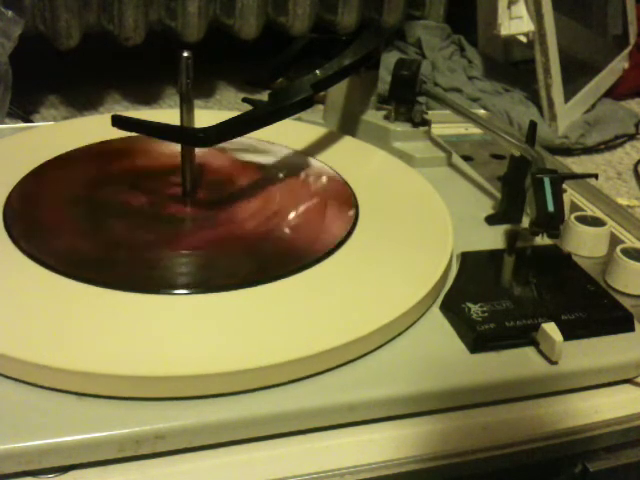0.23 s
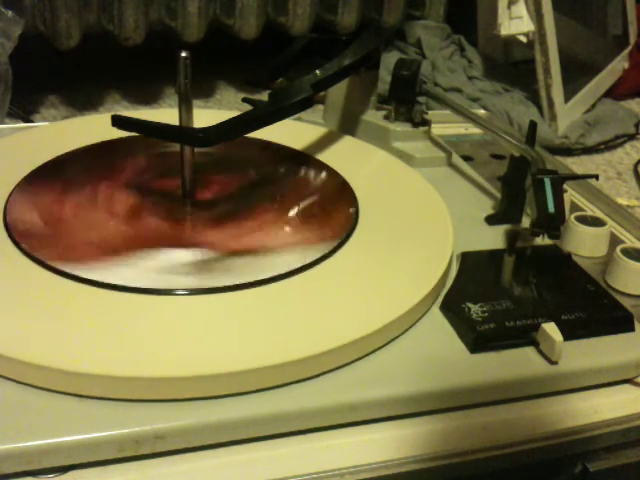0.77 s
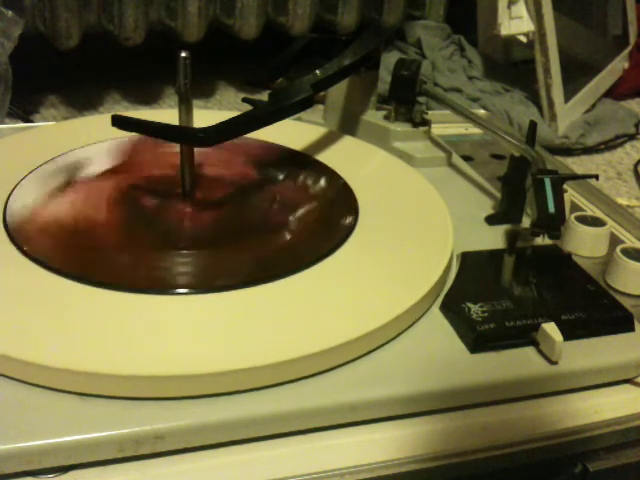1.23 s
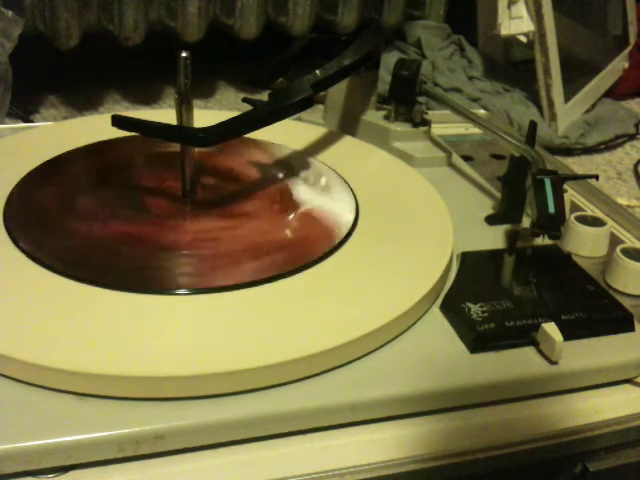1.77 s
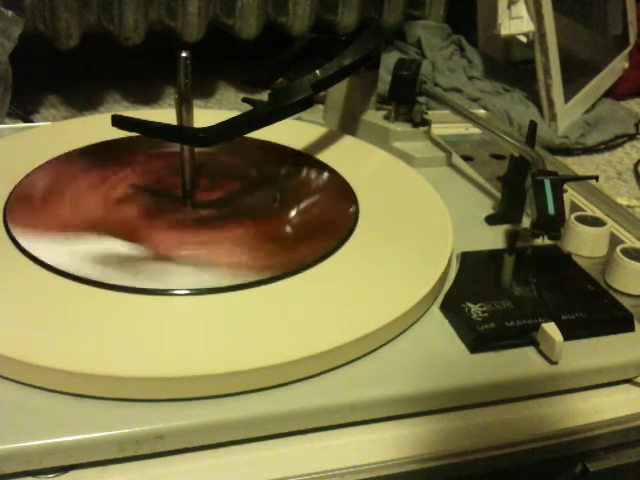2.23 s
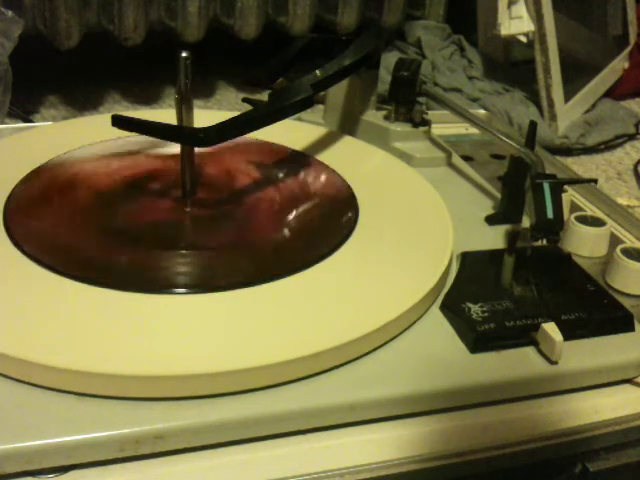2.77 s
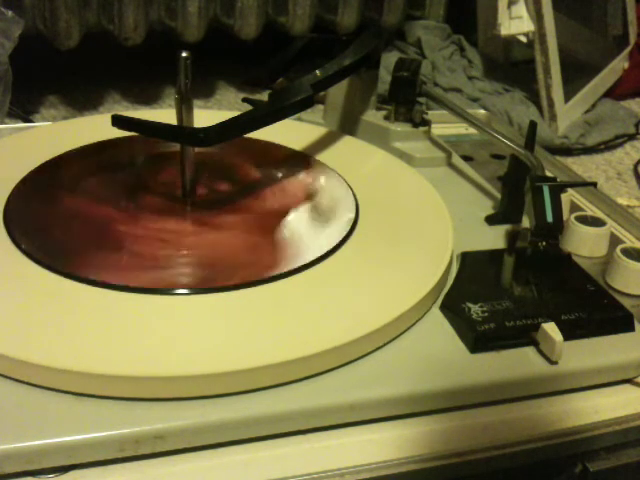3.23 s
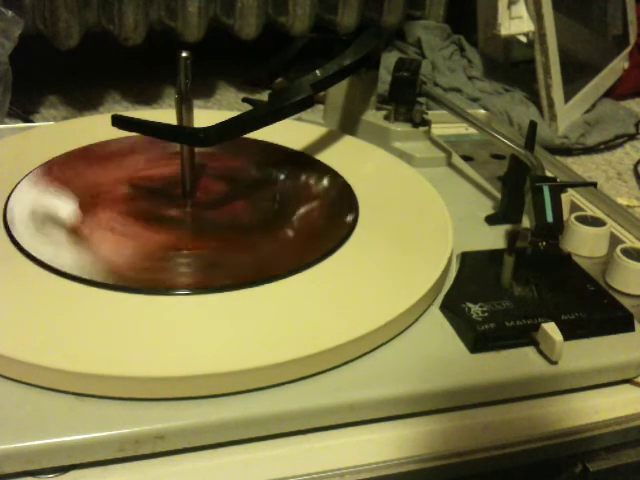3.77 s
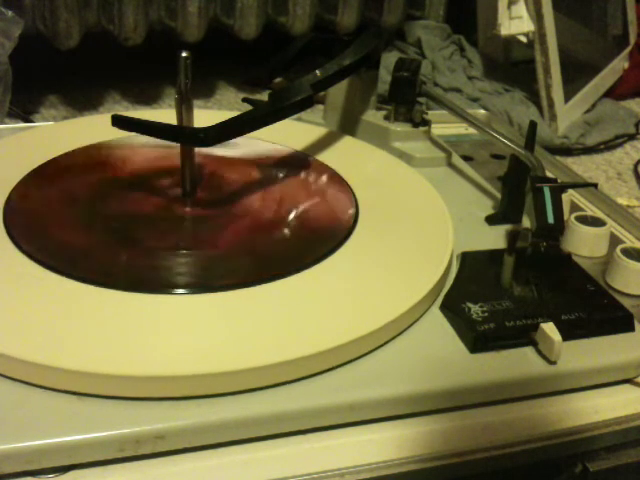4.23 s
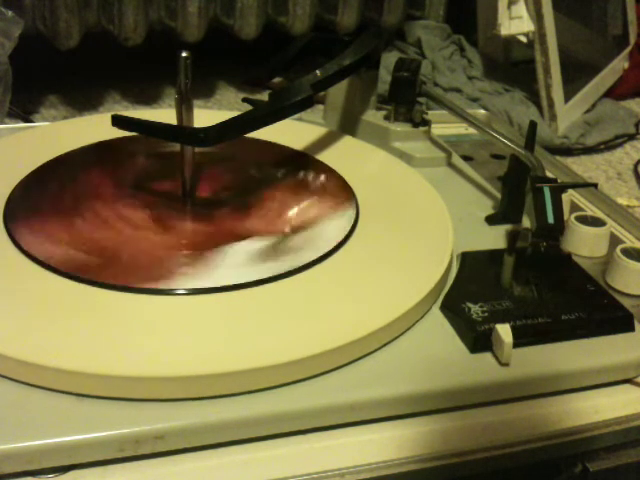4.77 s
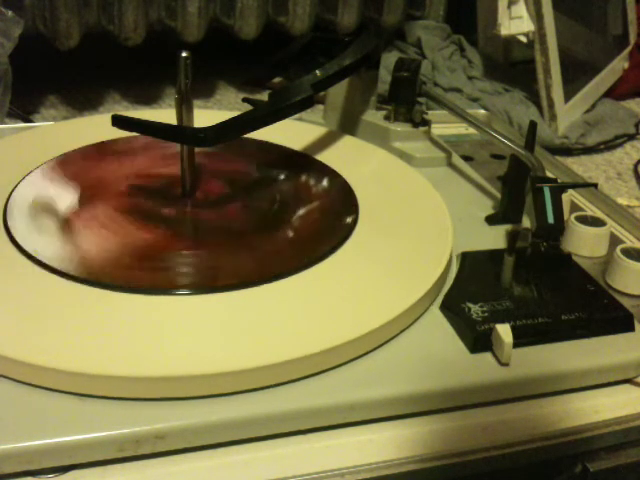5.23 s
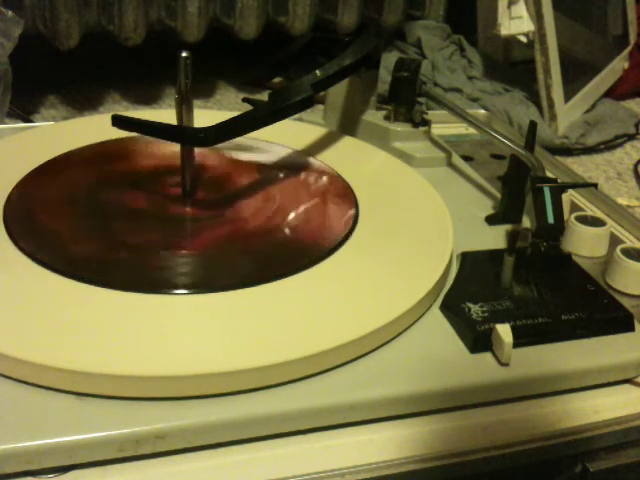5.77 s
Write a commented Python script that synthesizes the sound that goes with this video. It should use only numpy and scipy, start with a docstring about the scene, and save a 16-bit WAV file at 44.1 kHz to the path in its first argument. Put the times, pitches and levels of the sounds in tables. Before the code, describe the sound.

In a small quiet room, close phone microphone, an old record player turns with no music heard. Steady soft hiss, faint motor hum and a thin very high screen whine continue throughout. Small dry ticks come from under the deck, sparse and uneven, until a lever snaps with a sharp, loud metal clack around four and a half seconds. A much weaker clack follows, then a soft rub and faint ticks.

```python
"""Old record changer at work

In a small quiet room, with a phone close by, a cam ticks softly under the deck of an old record changer.
Then a lever snaps over with a sharp clack, and a smaller one follows. Each blow is a burst of noise that
rings the deck, the plinth (the base) and the metal levers; a softer rub follows, and the room echoes it all.
A tube screen whines high up as a few pure tones; motor hum and hiss are filtered noise."""
import sys
import numpy as np
from scipy import signal
from scipy.fft import rfft, irfft
from scipy.io import wavfile
from scipy.ndimage import uniform_filter1d

SR = 44100
rng = np.random.default_rng(int(sys.argv[2]) if len(sys.argv) > 2 else 0)


def undo_db(level):
    """Turn decibels back into plain size, where 20 dB means ten times bigger."""
    steps = np.asarray(level, float) / 20
    return 10 ** steps


def digitize_waveform(pressure):
    """Quantize a signal to 16-bit integers and store it at the path in sys.argv[1].

    Rows of a 2-D input are taken as channels; values are limited to [-1, 1].
    """
    field = np.atleast_2d(pressure).T
    bounded = np.clip(field, -1, 1)
    quanta = np.round(bounded * 32767).astype(np.int16)
    wavfile.write(sys.argv[1], SR, quanta)


N = 264600  # length in samples: 6 seconds
TIME = np.arange(N) / SR  # seconds
HZ = np.maximum(np.arange(N // 2 + 1) * SR / N, 1)  # spectrum frequencies, kept above 0 for the log

# Blows in the mechanism. Each row: start in seconds, peak of the deck ring in dB, pitch of the struck
# spot in Hz, peak of the plinth thud in dB, peak of the metal crack in dB (before its lever ring is added).
BLOWS = [(0.2557, -57, 1800, -79, -61), (0.3008, -36.5, 1460, -63, -57), (0.554, -48.5, 1440, -57.5, -65.5),
         (0.5747, -54, 1570, -63, -79), (1.3671, -53.5, 1680, -65, -64), (3.004, -52, 1800, -71, -88),
         (3.0177, -60, 4320, -74, -44.5), (3.0213, -52, 1740, -71, -83), (3.045, -57, 1880, -75, -85),
         (3.771, -49, 2340, -77.5, -67), (3.9394, -66.5, 4200, -96, -66), (4.149, -54, 1600, -83, -69),
         (4.1622, -44.5, 1940, -68.5, -56), (4.1985, -52.5, 1800, -74, -57),
         (4.4725, -30, 1500, -45, -19.5), (4.483, -17.5, 2940, -47, -10.5), (4.4857, -17.5, 2590, -36, -7),
         (4.497, -25.5, 1500, -38, -22.5), (4.5188, -30.5, 1740, -41.5, -16.5),
         (4.746, -59.5, 1830, -82, -78), (4.8144, -41, 1170, -44.5, -36.5),
         (4.8202, -35.5, 3500, -54.5, -70), (4.8253, -41, 1640, -58.5, -38),
         (5.4515, -57, 1120, -63.5, -61), (5.5088, -64, 1248, -69, -63), (5.808, -58, 1296, -64, -67),
         (5.876, -61, 960, -76, -69), (5.9217, -62, 1380, -64.5, -74)]
# Ringing tones of the metal levers. Each row: pitch in Hz, relative level in dB, time to fall 60 dB in seconds.
LEVER_TONES = [(4560, -3, 0.0816), (5623, -8, .07), (6446, -5, 0.059), (7150, -9, .08), (8240, -6, 0.062),
               (9500, -6, 0.031), (10280, -1.5, 0.089), (12200, -3, .06), (12900, -8.5, .06)]
# Colour of the crack as it leaves the deck. Each row: frequency in Hz, relative gain in dB.
CRACK_COLOUR = [(1500, -26), (3000, -13.5), (4600, -4.5), (7300, -2), (10000, -1), (13000, -4.5),
                (15800, -21)]
# Resonances of the plinth. Each row: pitch in Hz, width in Hz, relative gain in dB.
PLINTH_MODES = [(173, 64, -20), (289, 120, -8.5), (400, 120, -3), (540, 110, 0), (740, 203, 7),
                (1145, 200, -3.5)]
# Resonances of the deck. Each row: pitch in Hz, width in Hz, relative gain in dB before the spot loss.
DECK_MODES = [(957, 170, -10), (1260, 200, 1.5), (1640, 170, 3), (1950, 400, 2), (2210, 460, 0),
              (2430, 310, 3), (3100, 280, -7), (3585, 390, 2.5), (4340, 2200, -7), (5600, 340, -8.5)]
# A lever sliding, then a low shove. Each row: middle in seconds, spread in seconds, level at the middle in dB,
# centre of the noise in Hz, width in Hz.
SLIDES = [(5.045, 0.041, -75.5, 8570, 7000), (5.5, 0.066, -86, 81, 50.1)]
# Echo of the room. Each row: frequency in Hz, time to fall 60 dB in seconds, relative level in dB.
ROOM_ECHO = [(150, 0.11, -4), (463, 0.39, 0.5), (1500, 0.26, 2.5), (3500, 0.18, 6), (7370, 0.23, 6.5),
             (12990, 0.16, 2)]
# The wall behind the deck. Its one row: delay in seconds, gain in dB, centre in Hz, width in Hz.
WALL = (.0175, -8, 1700, 2200)
# Level of the screen whine. Each row: time in seconds, level in dB before the waver.
WHINE_LEVEL = [(0, -62), (.35, -64.5), (.9, -67), (1.3, -70), (1.55, -68.6), (1.8, -65.6), (2.1, -66.5),
               (2.55, -65), (3.5, -68), (4.1, -64.5), (4.4, -66.5), (4.64, -68.5), (4.9, -59.5),
               (5.3, -60.5), (5.55, -64), (5.8, -59), (6, -64)]
# Side tones of the whine. Each row: distance from it in field rates, level in dB.
SIDE_TONES = [(-5, -97), (-1, -85), (1, -83), (2, -93), (3, -92), (4, -93)]
# How far the whine wavers. Each row: time in seconds, typical swing in dB.
WAVER = [(4.7, .4), (4.9, 2.2)]
# Motor hum. Each row: pitch in Hz, width in Hz, level in dB.
HUM = [(183.2, 5.4, -82), (243.1, 11, -90), (304.4, 8.8, -82.5)]
# Colour of the room and microphone hiss. Each row: frequency in Hz, relative level per Hz in dB.
HISS_COLOUR = [(18, -69), (30, -58), (59, -16.5), (183, -6), (300, -6), (409, -10.5), (888, -9.5),
               (2030, -17), (5570, -20), (8870, -18.5), (14500, -21)]
# Swell of the lower hiss, fuller at both ends. Each row: time in seconds, gain in dB before the flutter.
RUSTLE = [(0, 3.5), (.5, 3), (1.4, 2.7), (2.3, 2.1), (4.6, 2), (6, 3)]


def rms1(x):
    """Scale to an average (rms) strength of 1."""
    return x / np.sqrt(np.mean(x ** 2))


def peak1(x):
    """Scale so the highest peak is 1."""
    return x / np.abs(x).max()


def colour(x, points):
    """Filter by gains at a few frequencies, joined by straight lines on a log pitch axis."""
    hz, db = np.transpose(points)
    gain = undo_db(np.interp(np.log(HZ), np.log(hz), db))
    return irfft(rfft(x) * gain, N)


def even(x, size):
    """Smooth out chance peaks and holes of a spectrum, averaged over size bins."""
    spectrum = rfft(x)
    power = uniform_filter1d(np.abs(spectrum) ** 2, size)
    return irfft(spectrum / np.sqrt(power + 1e-18), len(x))


def ring(x, hz, width):
    """One resonance, with gain 1 at its centre."""
    return signal.lfilter(*signal.iirpeak(hz, hz / width, fs=SR), x)


def ring_body(push, modes):
    """A solid body rings at many pitches at once; neighbouring modes have opposite signs."""
    total = 0
    for k, (hz, width, db) in enumerate(modes):
        # the second, wider pass trims what lies far from the pitch
        mode = ring(ring(push, hz, width), hz, 3 * width)
        total = total + (-1) ** k * undo_db(db) * mode
    return total


def walk(rate):
    """Random levels, rate new ones a second, smoothed twice and scaled to unit spread."""
    hold = int(SR / rate)
    steps = np.repeat(rng.standard_normal(N // hold + 1), hold)
    smooth = uniform_filter1d(uniform_filter1d(steps, hold), hold)
    return rms1(smooth[:N])


def contact_noise(t, u):
    """A blow is a short chatter of contacts, after which loose parts rattle on."""
    chatter = even(rng.standard_normal(len(t)) * u * np.exp(-u), size=4)
    chatter = chatter * np.minimum(3.3 * u, 1) * np.exp(-(u / 5) ** 2)
    rattle_db, rattle_ms = -18, 15  # peak against the chatter, fading time
    rattle = rng.standard_normal(len(t)) * np.minimum(u / 2, 1) * np.exp(-1000 * t / rattle_ms)
    return peak1(chatter) + undo_db(rattle_db) * peak1(rattle)


def deck_ring(chatter, spot_hz, contact_ms):
    """Deck modes near the pitch of the struck spot ring most; a longer contact wakes fewer of them."""
    loss_db = 12.5 + 0.3 * contact_ms  # per octave away from the spot
    modes = [(hz, width, db - loss_db * abs(np.log2(hz / spot_hz))) for hz, width, db in DECK_MODES]
    return peak1(ring_body(chatter, modes))


def plinth_thud(chatter, u):
    """The plinth thumps under a smooth push plus the chatter."""
    push = 0.69 * peak1(u * np.exp(-3 * u)) + peak1(chatter)
    return peak1(ring_body(push, PLINTH_MODES))


def metal_crack(chatter, crack_response, lever):
    """The coloured chatter is a bright crack that also sets the metal levers ringing."""
    lever_db = -20.5  # peak of the ring against the crack
    crack = signal.fftconvolve(chatter, crack_response)[256:256 + len(chatter)]
    lever_ring = signal.fftconvolve(crack, lever)[:len(chatter)]
    return peak1(crack) + undo_db(lever_db) * peak1(lever_ring)


def slides():
    """Soft rubbing after the clacks: filtered noise that swells and fades once a row."""
    out = np.zeros(N)
    for middle, spread, db, hz, width in SLIDES:
        swell = np.exp(-.5 * ((TIME - middle) / spread) ** 2)
        out += undo_db(db) * swell * rms1(ring(rng.standard_normal(N), hz, width))
    return out


def mechanism():
    """Each blow rings the deck, thumps the plinth and cracks the levers; the slides are added."""
    t = TIME[:4096]
    lever = 0
    for hz, db, t60 in LEVER_TONES:
        lever = lever + undo_db(db) * np.exp(-np.log(1000) * t / t60) * np.sin(2 * np.pi * hz * t)
    click = 1. * (np.arange(N) == 256)
    crack_response = colour(click, CRACK_COLOUR)[:512]
    out = np.zeros(N + len(t))
    for start, deck_db, spot_hz, thud_db, crack_db in BLOWS:
        # 2.68 ms of contact on a spot that rings at 1 kHz; stiffer, higher spots let go sooner
        contact_ms = 2.68 * (1000 / spot_hz) ** .7
        u = 1000 * t / contact_ms  # time counted in contacts
        chatter = contact_noise(t, u)
        blow = undo_db(deck_db) * deck_ring(chatter, spot_hz, contact_ms)
        blow += undo_db(thud_db) * plinth_thud(chatter, u)
        blow += undo_db(crack_db) * metal_crack(chatter, crack_response, lever)
        i = int(start * SR)
        out[i:i + len(t)] += blow
    return out[:N] + slides()


def room(x):
    """Dense reflections build up in a few ms and die away band by band; one wall answers, dull."""
    t = TIME[:SR // 2]
    hz, t60, db = np.transpose(ROOM_ECHO)
    # even out the spectrum of a fading noise, then undo the fade over the first 0.3 s
    noise = even(rng.standard_normal(len(t)) * np.exp(-t / .03), size=120)
    noise = noise * np.exp(np.minimum(t, .3) / .03)
    spectrum = rfft(noise)
    octave = np.log2(np.arange(len(t) // 2 + 1) * SR / len(t) + 1)
    tail = 0
    for centre in np.arange(6, 15, .5):
        # overlapping bands, half an octave apart, that add up flat
        band = irfft(spectrum * np.maximum(1 - 2 * np.abs(octave - centre), 0), len(t))
        decay = np.exp(-np.log(1000) * t / np.interp(centre, np.log2(hz), t60))
        tail = tail + undo_db(np.interp(centre, np.log2(hz), db)) * band * decay
    tail = tail * (1 - np.exp(-t / 0.0051))
    response = undo_db(-.5) * tail / np.sqrt(np.sum(tail ** 2))  # echo energy in dB against the direct sound
    response[0] += 1  # the direct sound
    delay, wall_db, wall_hz, width = WALL
    bounce = 1. * (np.arange(len(t)) == int(delay * SR))
    response += undo_db(wall_db) * ring(bounce, wall_hz, width)
    return signal.fftconvolve(x, response)[:N]


def screen():
    """The line-scan tone with side tones at the field rate; it wavers more once things move in its sound waves."""
    line_hz, field_hz = 15382.7, 58.6
    waver = np.interp(TIME, *np.transpose(WAVER)) * walk(45)  # 45 new levels a second
    db = np.interp(TIME, *np.transpose(WHINE_LEVEL)) + waver
    tones = undo_db(db) * np.sin(2 * np.pi * line_hz * TIME)
    for k, side_db in SIDE_TONES:
        tones += undo_db(side_db) * np.sin(2 * np.pi * (line_hz + k * field_hz) * TIME)
    return np.sqrt(2) * tones  # so the table levels are rms


def motor_hum():
    """The motor hums in a few narrow bands of noise."""
    return sum(undo_db(db) * rms1(ring(rng.standard_normal(N), hz, width)) for hz, width, db in HUM)


def room_hiss():
    """Steady room and microphone hiss whose lower part swells with movement nearby."""
    hiss_db, rustle_hz = -72.5, 2490  # rms before the swell, upper edge of the swelling part
    hiss = undo_db(hiss_db) * rms1(colour(rng.standard_normal(N), HISS_COLOUR))
    low = signal.sosfilt(signal.butter(1, rustle_hz, fs=SR, output="sos"), hiss)
    flutter_db = 0.54 * walk(12)
    swell = undo_db(np.interp(TIME, *np.transpose(RUSTLE)) + flutter_db)
    return hiss - low + swell * low


def scene():
    """The mechanism in its room, over whine, hum and hiss."""
    return (room(mechanism()) + screen() + motor_hum() + room_hiss())[None]


def top_cut(x):
    """Nothing passes above the cut-off."""
    return signal.sosfilt(signal.butter(12, 16160, fs=SR, output="sos"), x)


def record(dry):
    """The phone cuts the deep bass below 100 Hz and the very top above 15760 Hz."""
    x = signal.sosfilt(signal.butter(6, 100, "high", fs=SR, output="sos"), dry)
    x = signal.sosfilt(signal.ellip(10, .2, 80, 15760, fs=SR, output="sos"), x)
    return top_cut(x)


dry = scene()
out = record(dry)
digitize_waveform(out)
```